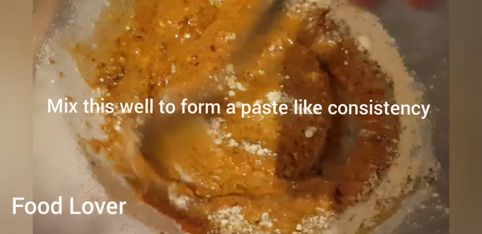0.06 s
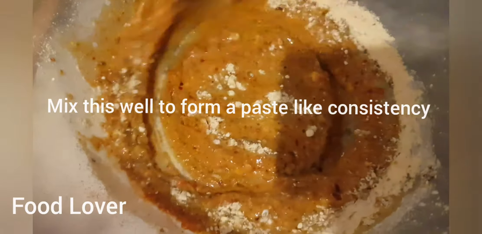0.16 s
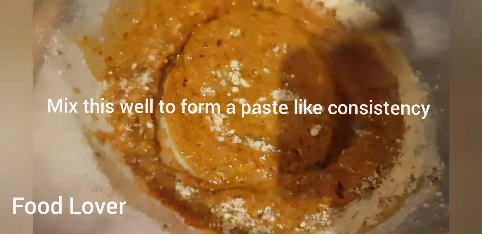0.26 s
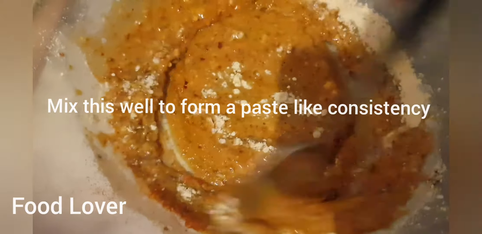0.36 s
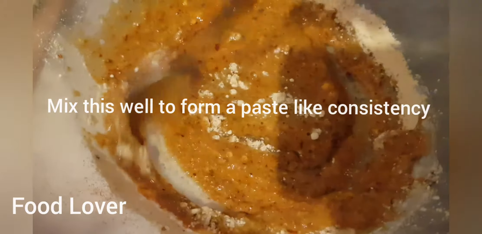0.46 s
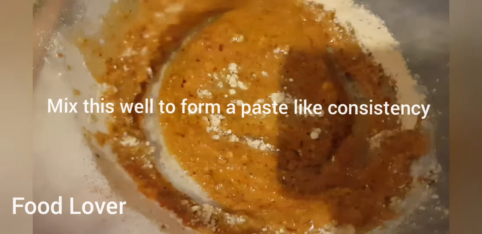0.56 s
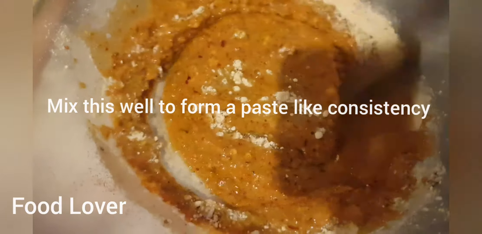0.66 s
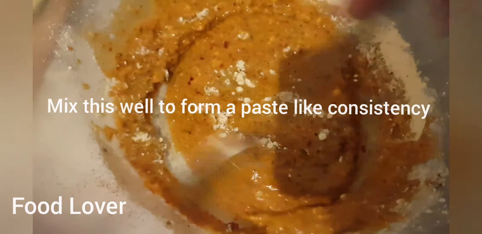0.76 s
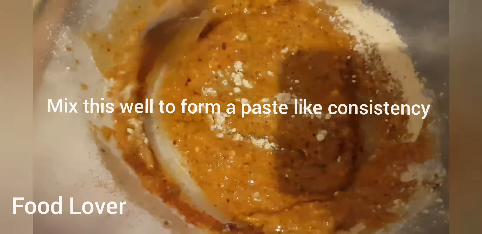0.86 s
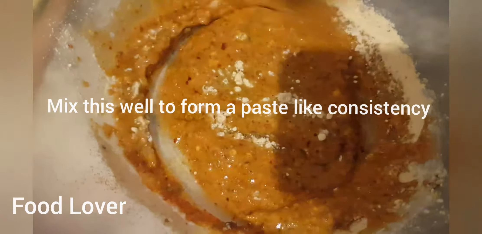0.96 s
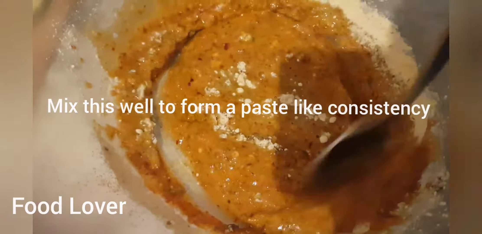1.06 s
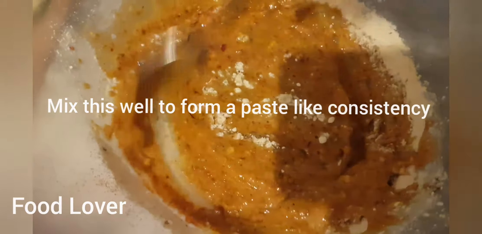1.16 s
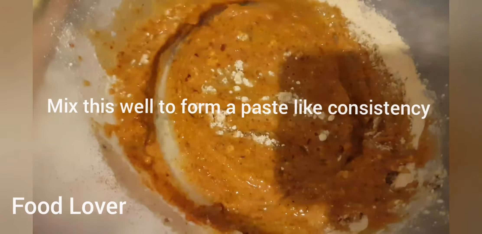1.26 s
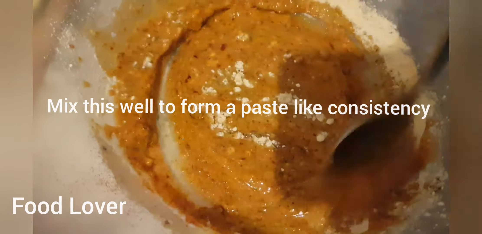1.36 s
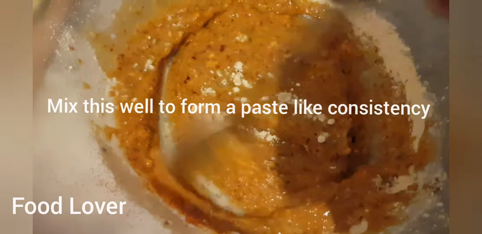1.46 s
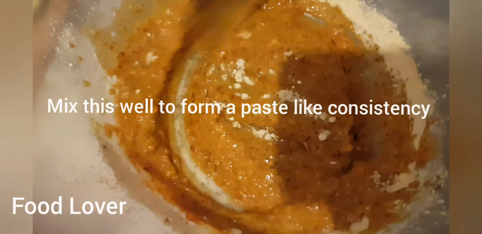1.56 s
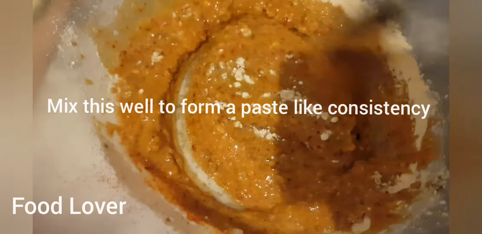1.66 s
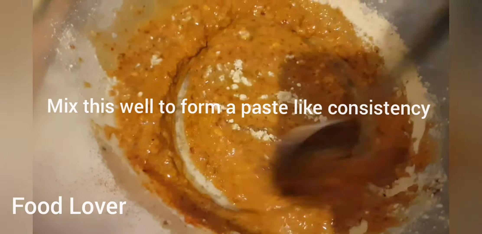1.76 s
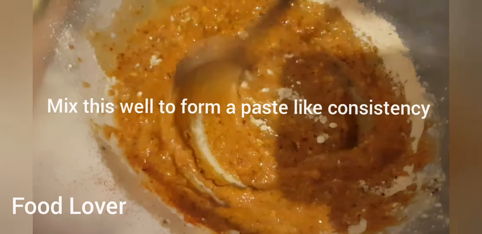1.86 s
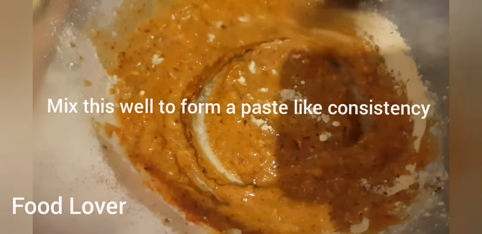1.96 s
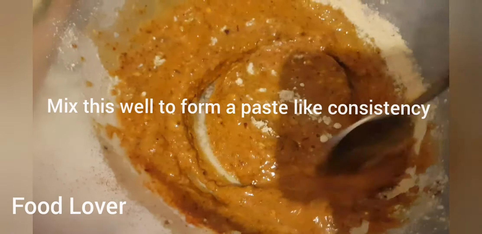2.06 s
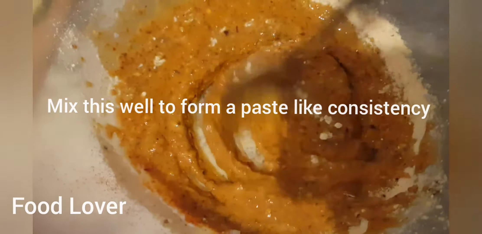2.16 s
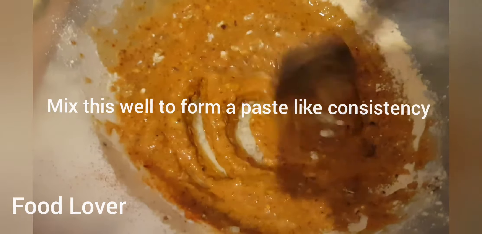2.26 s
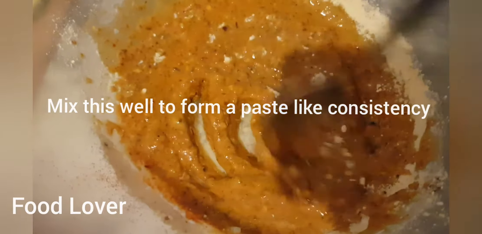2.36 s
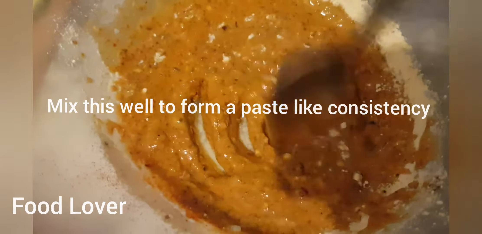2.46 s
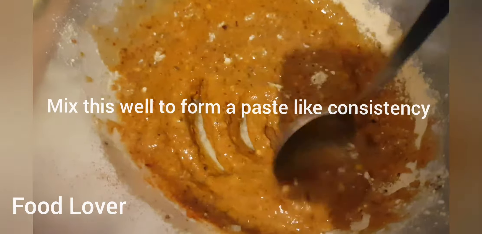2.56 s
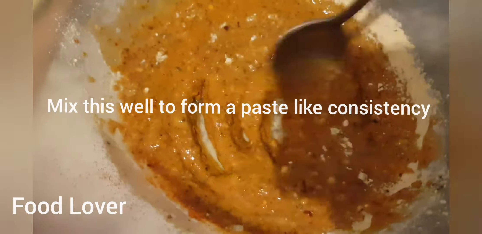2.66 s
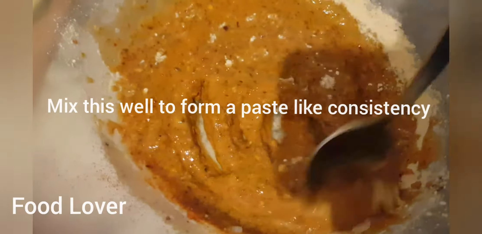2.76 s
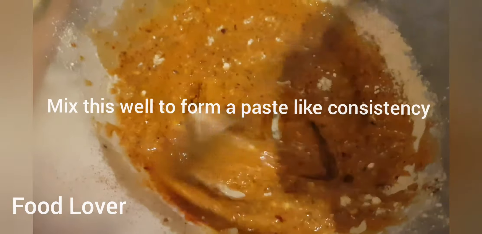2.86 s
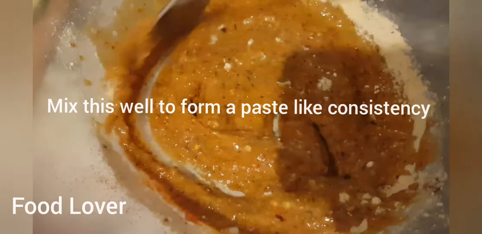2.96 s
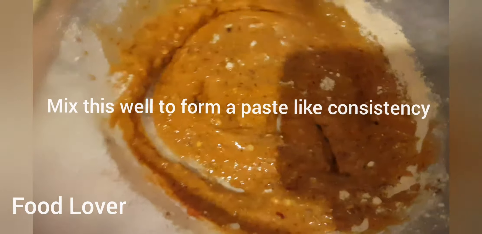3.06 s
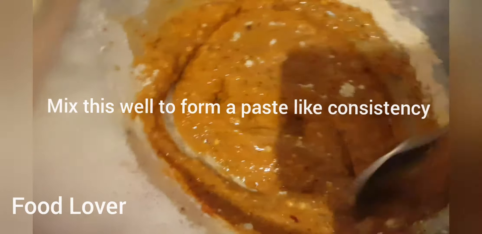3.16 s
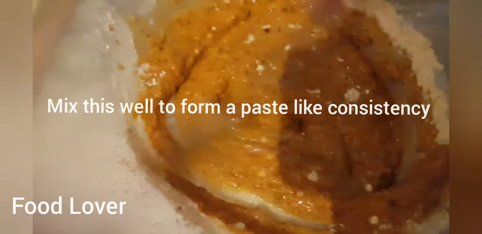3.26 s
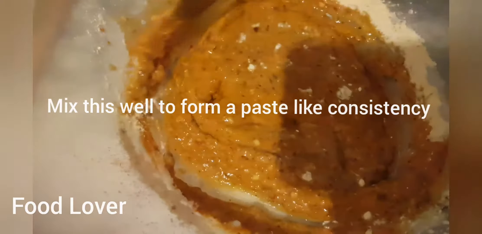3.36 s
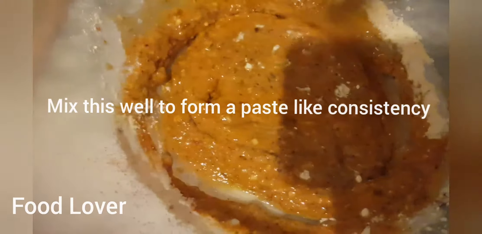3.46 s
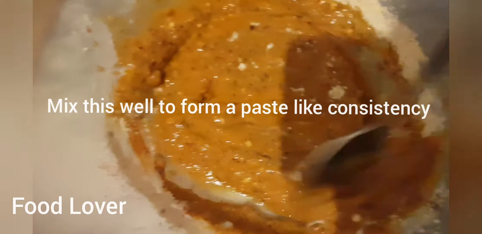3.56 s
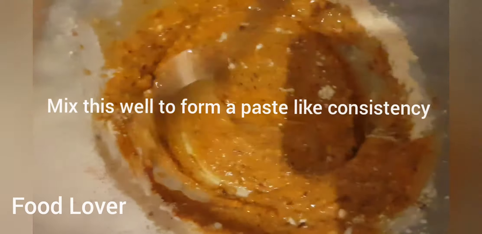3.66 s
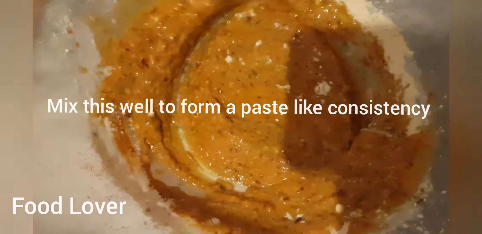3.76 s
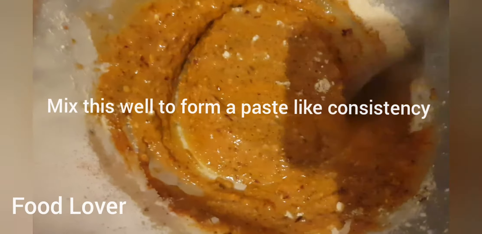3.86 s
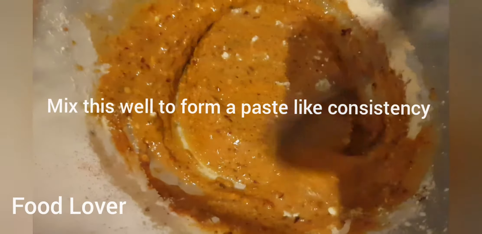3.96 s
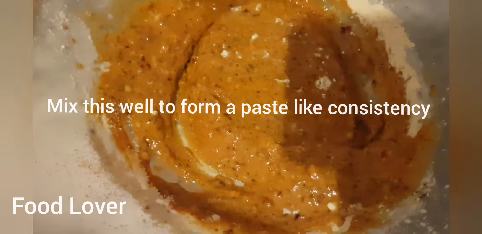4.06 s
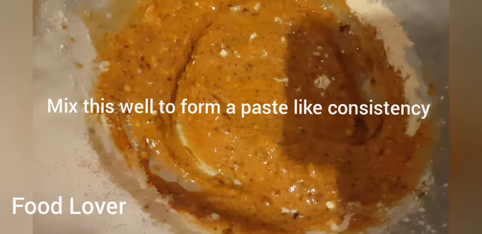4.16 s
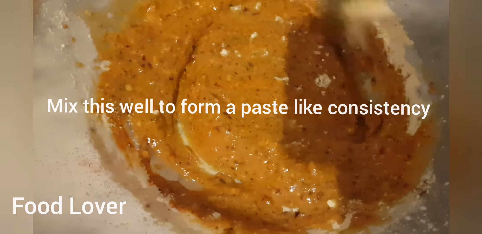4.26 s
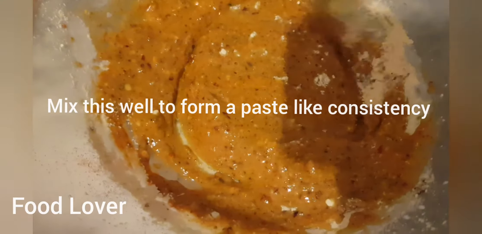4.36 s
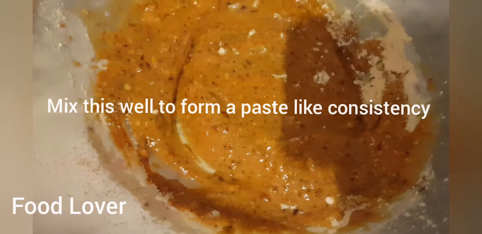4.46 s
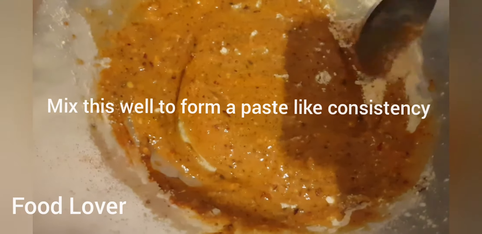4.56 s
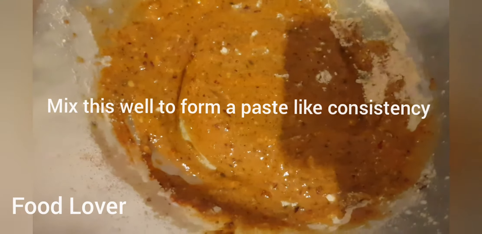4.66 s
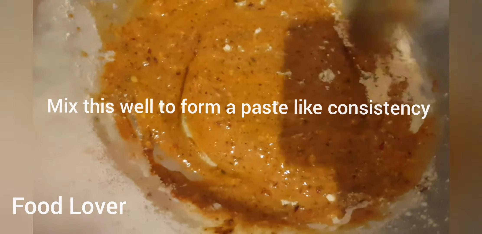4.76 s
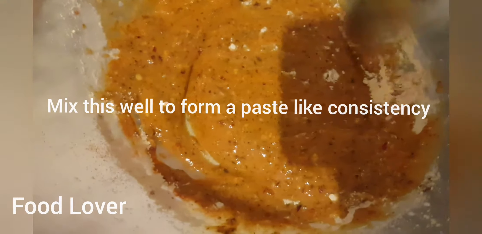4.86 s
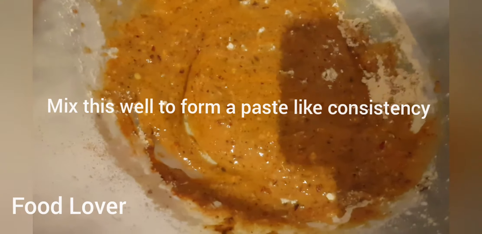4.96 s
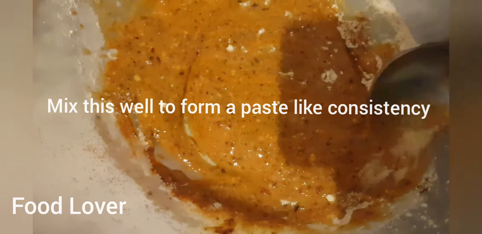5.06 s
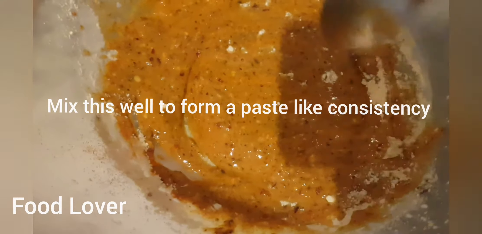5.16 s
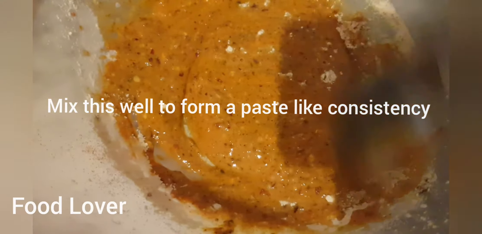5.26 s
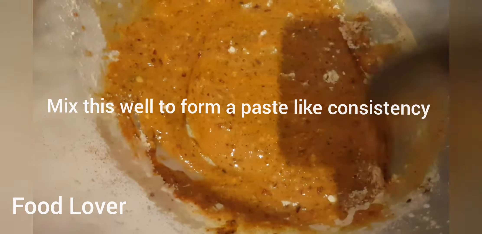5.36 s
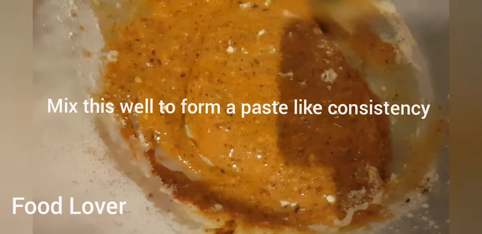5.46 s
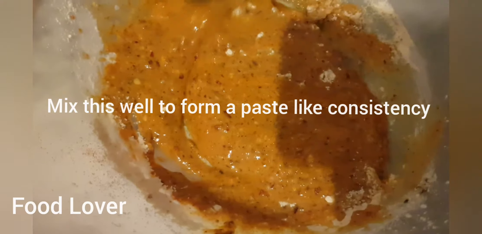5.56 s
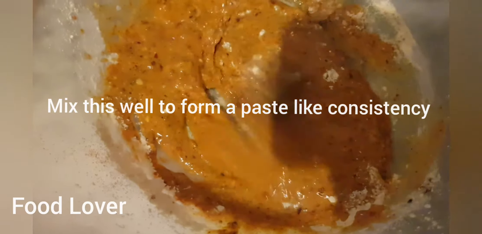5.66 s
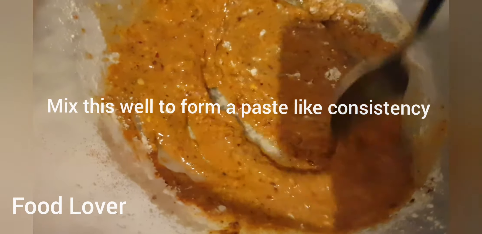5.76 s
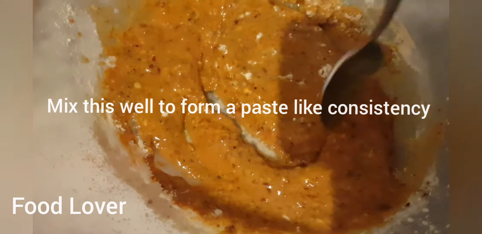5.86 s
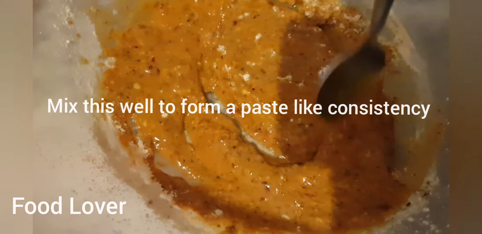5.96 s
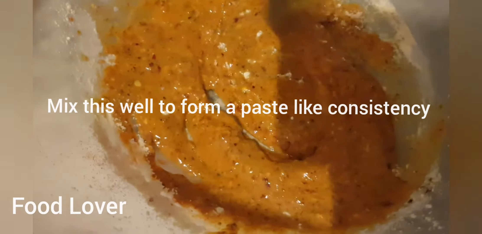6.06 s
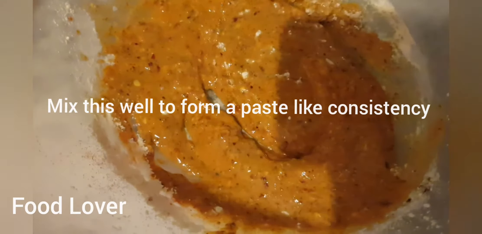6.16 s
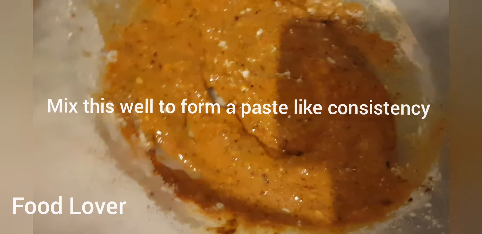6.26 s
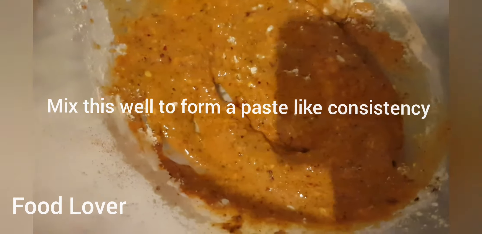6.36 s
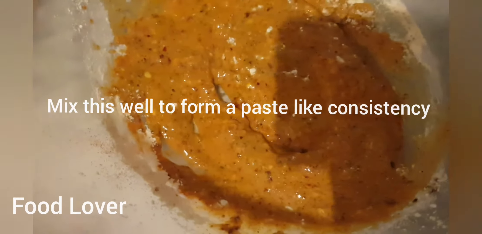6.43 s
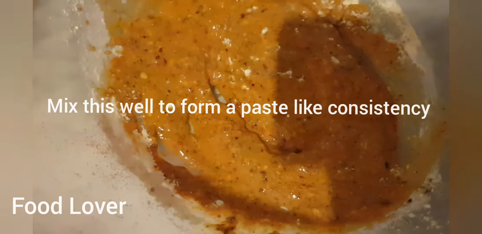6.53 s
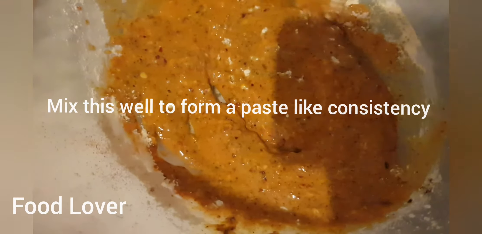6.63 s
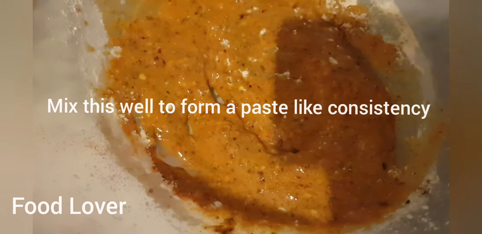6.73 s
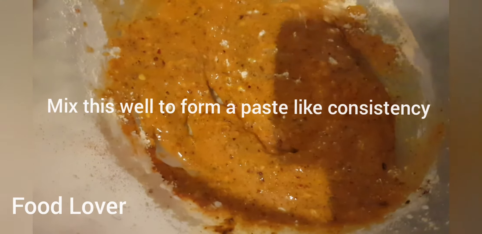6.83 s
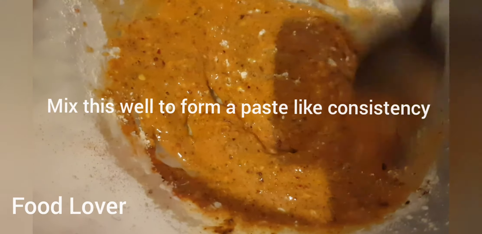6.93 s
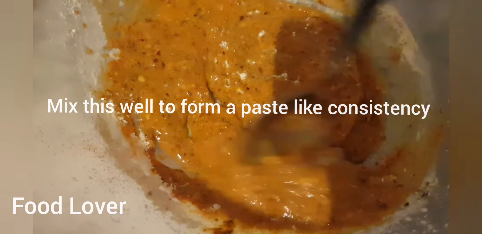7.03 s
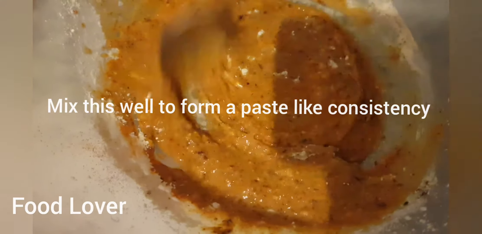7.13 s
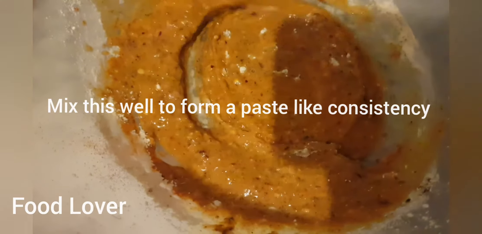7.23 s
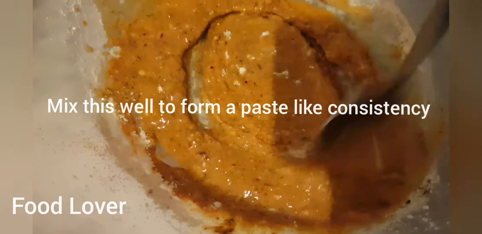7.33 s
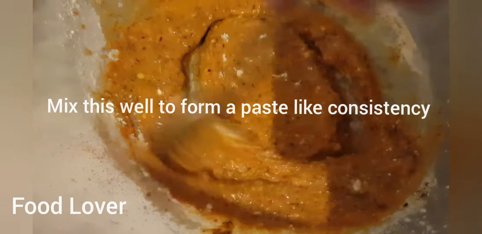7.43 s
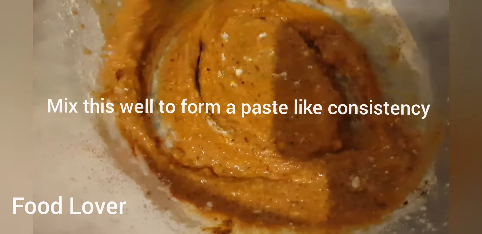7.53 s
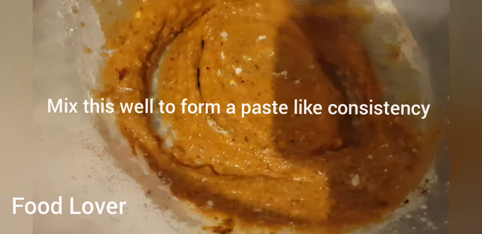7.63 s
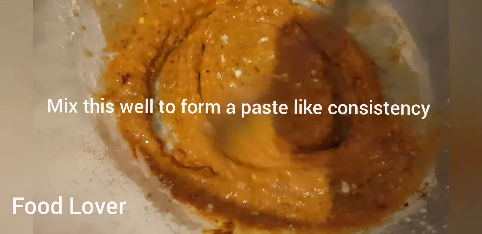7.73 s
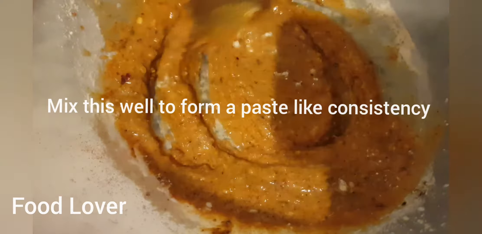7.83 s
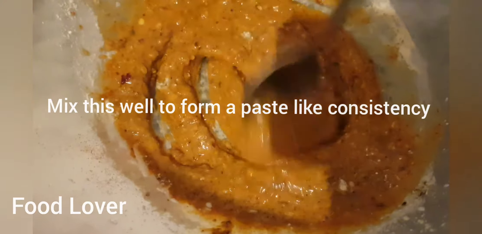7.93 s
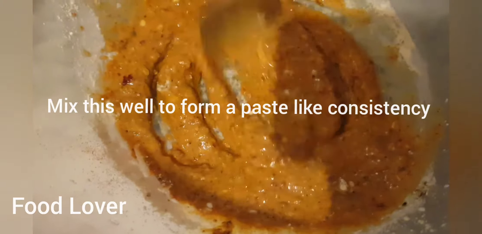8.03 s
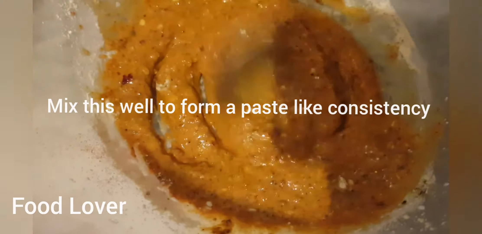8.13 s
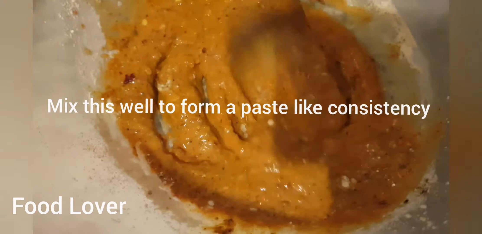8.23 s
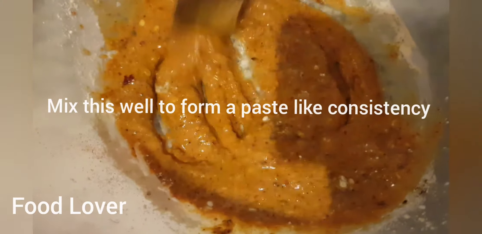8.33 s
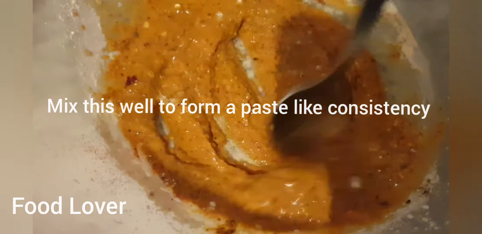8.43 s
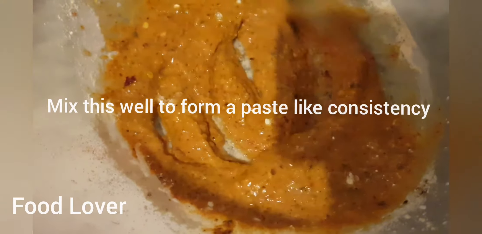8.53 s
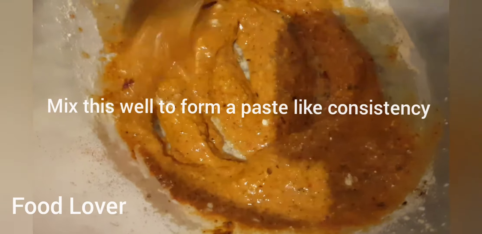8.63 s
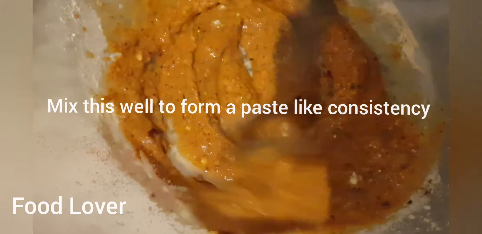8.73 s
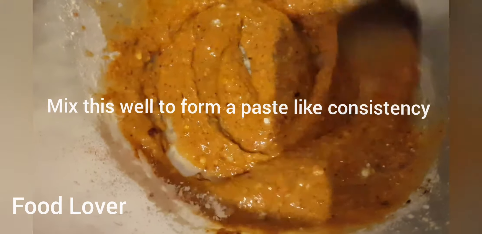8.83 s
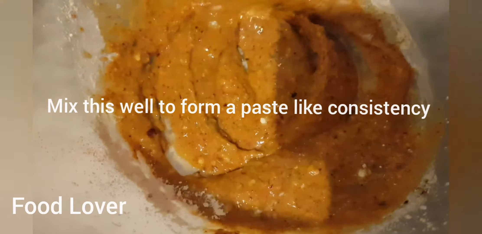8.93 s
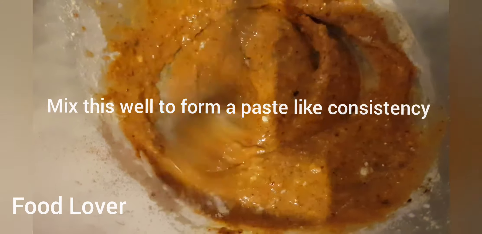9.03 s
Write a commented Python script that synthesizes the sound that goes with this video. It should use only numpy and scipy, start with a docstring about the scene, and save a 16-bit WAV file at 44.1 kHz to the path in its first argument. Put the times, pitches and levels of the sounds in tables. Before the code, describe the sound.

A metal spoon works thick, grainy paste in a plastic bowl on a counter. Low wall rumble and raspy wet strokes come first, with a hard knock at about two seconds and quick scrapes after it. The middle is quieter, mostly separate dull knocks; after seven seconds the strokes become brisk and squelchy. Close stereo phone microphone, slightly louder on the left, in a small hard kitchen with faint background hum.

```python
"""Stirring thick paste in a bowl

A metal spoon stirs paste in a plastic bowl on a kitchen counter, close to a phone, heard in stereo.
Random grit slips shake the bowl wall, rim and spoon blade; noise bursts make paste scuffs.
Knocks ring the low modes of the bowl and counter, with a short crack of steel.
A small hard room adds a dull echo, over a faint background hum of shaped noise."""
import sys
import numpy as np
from scipy import signal
from scipy.fft import rfft, irfft, next_fast_len
from scipy.io import wavfile
from scipy.ndimage import uniform_filter1d, map_coordinates

SR = 44100
rng = np.random.default_rng(int(sys.argv[2]) if len(sys.argv) > 2 else 0)


def waveform_to_disk(signal):
    """Save audio, clipped to [-1, 1], as 16-bit WAV at the path in sys.argv[1]."""
    frames = np.transpose(np.atleast_2d(signal))
    scaled = np.clip(frames, -1, 1) * 32767
    samples = np.round(scaled).astype(np.int16)
    wavfile.write(sys.argv[1], SR, samples)


N = 400869

# spoon meets the bowl wall: start_s, strength_db (relative), then three levels against the thud, each
# before a fixed offset: crack_db, counter_thump_db, lowest_bowl_modes_db
KNOCKS = [(0.167, -22.5, -32, -1, -8), (0.41, -22, -33, -14, -22), (0.75, -23.5, -22, -13, 3),
          (0.897, -19, -27, -8, -28), (1.049, -11, -31, -54.5, -16.5), (1.499, -16.5, -30.5, -24, -17.5),
          (1.675, -16, -23, -6.5, -1), (2.0058, -4, -16, -17.5, -34), (2.136, -21.5, -26, -11.5, -5.5),
          (2.748, -22.5, -24, -14.5, -7.5), (2.887, -28.5, -32, -5.5, 4.5), (3.269, -9, -33, -26, -9),
          (4.127, -34, -14, -1, 0.5), (4.414, -15.5, -16.5, -38, -1), (4.682, -9, -12.5, -58, -4),
          (4.949, -10, -14, -49, -4), (5.331, -7.5, -16.5, -9, -6.5), (5.348, -14.5, -28, -10, -9),
          (5.526, -21.5, -32, -25.5, -30), (5.743, -7, -38, -17, -12), (5.858, -15.5, -26, -11.5, -8.5),
          (6.185, -10.5, -24, -23.5, -4), (6.431, -25, -21.5, -6, -0.5), (6.514, -20.5, -21, -28, -26),
          (6.7, -12, -29.5, -28.5, -8), (6.7067, -13, -30, -30, -8), (6.842, -23, -37, -33.5, -28),
          (7.319, -17, -29, -48.5, -8.5), (7.436, -24, -21.5, -34, -13), (7.935, -17.5, -29, -44, -20),
          (8.266, -21.5, -24, -7, -22), (8.297, -24, -19, -14.5, -5), (8.549, -19, -15.5, -35, -26),
          (8.633, -23.5, -19.5, -6.5, -15), (8.916, -13, -41, -49, -31)]
# resonances of the bowl wall; the last, broad one is the wall pushed as a whole: pitch_hz, width_hz, level_db
BOWL = [(188.2, 32.4, 0), (256.7, 52, -4), (334.7, 58, -1.5), (412, 30, -8), (429.2, 52, -4.5),
        (509.7, 70, -10), (275, 144, -7.5)]
# worktop under the bowl: pitch_hz, width_hz, level_db
COUNTER = [(62, 74, -1), (122.5, 10, 0)]
# rim and spoon, damped by paste: pitch_hz, width_hz, level_db
RIM = [(650, 490, 3), (1086, 224, 4.5), (1614, 298, 8), (2036, 196, 8.5)]
# spoon blade damped by paste: pitch_hz, width_hz, level_db
BLADE = [(2450, 580, 2), (3540, 1440, -2.5), (4210, 490, -2.5)]


def amp(db):
    """Gain of a level in dB."""
    return 10 ** (np.asarray(db) / 20)


def unit(x):
    """x at rms 1."""
    return x / np.sqrt(np.mean(x ** 2) + 1e-20)


def along(points, hz):
    """Values between (Hz, value) points, read on a log frequency axis."""
    f, v = np.transpose(points)
    return np.interp(np.log(hz + 1), np.log(f + 1), v)


def wobble(rate):
    """A smooth random curve with rate knots a second."""
    return map_coordinates(rng.standard_normal(int(N * rate / SR) + 4), [np.arange(N) * rate / SR])


def filtered(x, response):
    """x shaped by a complex response of frequency."""
    m = next_fast_len(N + SR)
    return irfft(rfft(x, m) * response(np.fft.rfftfreq(m, 1 / SR)), m)[..., :N]


def modes(table):
    """Causal response of a set of damped resonances, with alternating signs."""
    def response(f):
        return sum((-1) ** k * amp(db) * 1j * f * w / (c * c - f * f + 1j * f * w)
                   for k, (c, w, db) in enumerate(table))
    return response


def roving(x, table, rate, depth_db):
    """x through resonances that each wax and wane as the spoon travels over their nodes."""
    total = 0
    for k, mode in enumerate(table):
        gain = amp(depth_db * np.tanh(wobble(rate)))
        total = total + (-1) ** k * gain * filtered(x, modes([mode]))
    return total


def soft(hz, top_hz):
    """Causal roll-off of a soft, paste-cushioned contact."""
    return 1 / (1 + 1.4j * hz / top_hz - (hz / top_hz) ** 2) ** 2


def grit(per_second, spread_db):
    """Random tiny slips of uneven but bounded size, rms 1."""
    hit = rng.random(N) < per_second / SR
    size = amp(spread_db * np.minimum(rng.exponential(size=N), 4.5))
    return unit(hit * rng.standard_normal(N) * size)


def patchy(x, depth_db):
    """x under a random gain field of time and frequency."""
    z = signal.stft(x, nperseg=256)[2]
    field = uniform_filter1d(rng.standard_normal(z.shape), size=6, axis=0)
    field = uniform_filter1d(field, size=8, axis=1)
    return signal.istft(z * amp(depth_db * unit(field)), nperseg=256)[1][:N]


def swells(rows, rounding):
    """Level in dB over time for each dB column; rounding 1 makes pointed swells, 2 makes bells."""
    t = np.arange(0, N, 64) / SR  # coarse time steps, filled in below
    peak_s, rise_ms, fade_ms, *levels_db = np.transpose(rows)[..., None]
    ms = 1000 * (t - peak_s)
    drop_db = 10 * np.where(ms < 0, -ms / rise_ms, ms / fade_ms) ** rounding
    curves = []
    for db in levels_db:
        power = (amp(db - drop_db) ** 2).sum(axis=0)
        curves.append(10 * np.log10(np.interp(np.arange(N) / SR, t, power) + 1e-12))
    return curves


def room_tone():
    """A faint background of shaped noise, partly shared by both ports, its level wavering slightly."""
    # background colour: pitch_hz, density_db (relative, per Hz)
    tone_colour = [(15, -61.5), (25, -15), (66, 0.5), (105, -14.5), (195, -9), (330, -16.5), (543, -27.5),
                   (984, -18.5), (1130, -28.5), (2530, -49), (15900, -45)]
    level_db = -54.5  # before the left-right tilt
    shared, left, right = rng.standard_normal((3, N))
    pair = np.array([shared + 0.33 * left, shared + 0.77 * right])
    pair = filtered(pair, lambda hz: amp(along(tone_colour, hz)))
    return amp(level_db + 1.0 * wobble(4.7)) * unit(pair) * amp([[1.5], [-1.5]])


def pressure():
    """Gain of the wall rumble: the spoon leans on the wall, and slides on after each knock."""
    # spoon leans on the wall: peak_s, rise_ms and fade_ms (each for the first 10 dB), rumble_db
    push_rows = [(0.024, 62, 23, -33), (0.239, 15, 8, -25.5), (0.251, 130, 98, -32), (0.313, 16, 6.8, -25),
                 (0.482, 180, 28, -33.5), (0.563, 35, 80, -28.5), (0.63, 76, 85.7, -26.5),
                 (0.79, 18, 290, -37.5), (1.147, 350, 115, -32), (1.265, 40, 6.1, -26.5),
                 (1.403, 89, 119, -32.5), (1.622, 28, 160, -33.5), (2.17, 180, 140, -40.5),
                 (2.51, 5.7, 49, -39.5), (2.936, 95, 63, -38.5), (2.998, 22, 17, -34), (3.1, 53, 100, -34),
                 (3.478, 230, 127, -33), (3.606, 45, 30, -37.5), (3.765, 37, 21, -35), (3.876, 96, 42, -33),
                 (4.272, 39, 18, -42), (4.565, 150, 49, -48.5), (4.747, 63, 39, -47.5), (4.82, 21, 19, -41),
                 (5.054, 86, 29, -40.5), (5.448, 45, 34, -33), (5.56, 11, 18, -32), (6.253, 43, 52, -39.5),
                 (6.537, 84, 16, -40.5), (6.94, 160, 100, -36), (7.471, 270, 168, -39),
                 (7.548, 10, 13, -31.5), (7.691, 21, 26, -37), (7.786, 10, 16, -35.5),
                 (8.15, 7.7, 12, -32.5), (8.336, 220, 160, -44), (8.546, 6.2, 9.9, -32),
                 (8.732, 117, 57, -35.5), (9.097, 170, 170, -33.5)]
    slide_db, slide_fade_db_per_s, slide_rise_s = -15.5, 290.5, 0.011  # level is against knock strength
    power = amp(swells(push_rows, rounding=1.54)[0]) ** 2
    t = np.arange(SR // 2) / SR
    for s, db, *_ in KNOCKS:
        after = power[round(s * SR):][:len(t)]
        slide = amp(db + slide_db - slide_fade_db_per_s * t) * (1 - np.exp(-(t / slide_rise_s) ** 2))
        after += slide[:len(after)] ** 2  # adds into power
    return np.sqrt(power)


def rumble():
    """Slips under pressure shake the wall and counter; wall modes vary as the spoon crosses their nodes."""
    slips = grit(1500, spread_db=2.0)
    wall = roving(slips, BOWL[:-1], 11, depth_db=5.0)
    shaken = wall - amp(-7.0) * filtered(slips, modes(COUNTER))
    # sliding drives the higher modes more than a blow does
    wall = filtered(shaken, lambda hz: soft(hz, top_hz=545) * 1j * hz / (260 + 1j * hz))
    # the hand evens out the loudest jolts
    even = wall / np.abs(uniform_filter1d(wall ** 2, size=SR // 25)) ** 0.18
    lumps = amp(1.2 * np.tanh(wobble(30)))  # lumps in the paste
    return pressure() * unit(lumps * even)


def drag():
    """Grit slips under the spoon edge and shakes rim and blade; wet paste hisses as it parts."""
    # strokes of the edge: peak_s, rise_ms and fade_ms (each for the first 10 dB),
    # rim_rasp_db, blade_rasp_db, wet_hiss_db (before the uneven grip)
    stroke_rows = [(0.114, 73, 54, -37, -38.5, -39), (0.236, 71, 36, -37, -40.5, -36),
                   (0.298, 30, 41, -40.5, -38.5, -37.5), (0.399, 77, 49, -40.5, -42, -47.5),
                   (0.482, 63, 40, -39, -50.5, -36.5), (0.619, 85, 163, -37.5, -41.5, -39.5),
                   (0.908, 180, 780, -41.5, -46.5, -46.5), (1.208, 27, 57, -36.5, -40.5, -39),
                   (1.389, 64, 30, -46.5, -47, -52.5), (1.558, 40, 52, -41.5, -43.5, -43),
                   (1.727, 270, 58, -41, -39.5, -42.5), (1.868, 35, 59, -32.5, -35.5, -39),
                   (2.013, 50, 67, -33.5, -35.5, -35.5), (2.184, 24, 47, -35, -35, -45.5),
                   (2.331, 47, 46, -41.5, -41, -50), (2.418, 18, 58, -36.5, -42.5, -49.5),
                   (2.517, 21, 39, -34.5, -35.5, -45.5), (2.628, 28, 43, -34, -38, -43),
                   (2.719, 37, 59, -36.5, -41, -47), (2.88, 42, 87, -50, -45, -43.5),
                   (3.134, 240, 280, -44, -47.5, -51), (3.462, 50, 48, -36, -45, -44),
                   (3.463, 360, 175, -45.5, -45.5, -49), (3.626, 14, 62, -45.5, -43, -37.5),
                   (3.827, 163, 89, -42, -43.5, -43), (4.245, 56, 48, -48, -42, -40.5),
                   (4.533, 76, 63, -52.5, -50, -49), (4.741, 37, 94, -49.5, -47, -47.5),
                   (5.027, 30, 63, -51, -51.5, -45.5), (5.449, 54, 32, -43.5, -47, -44),
                   (5.549, 69, 71, -45, -48.5, -48), (5.698, 76, 68, -44, -47.5, -49),
                   (5.86, 18, 63, -57, -59, -60.5), (6.245, 23, 50, -39.5, -44.5, -42.5),
                   (6.511, 43, 43, -41.5, -50, -42), (6.751, 28, 29, -40, -53.5, -46),
                   (6.915, 77, 90, -43.5, -43.5, -44.5), (7.112, 45, 72, -37.5, -37, -40.5),
                   (7.259, 44, 65, -41, -43, -45), (7.317, 35, 40, -38, -34, -42.5),
                   (7.41, 85, 250, -46.5, -47.5, -47), (7.665, 57, 57, -38, -35.5, -46.5),
                   (7.789, 30, 69, -36.5, -37.5, -38.5), (7.945, 37, 57, -33.5, -37.5, -49.5),
                   (8.051, 29, 33, -33, -37.5, -38), (8.189, 40.6, 18, -28, -32, -38),
                   (8.27, 40, 44, -35, -40, -36.5), (8.423, 51, 35, -32.5, -33.5, -38),
                   (8.556, 65, 55, -33.5, -34, -37.5), (8.638, 26, 15, -40.0, -39.5, -33),
                   (8.728, 130, 96, -45, -40.5, -46), (9.07, 127, 47, -38.5, -41.5, -39)]
    # hiss colour: pitch_hz, density_db (relative, per Hz)
    hiss_colour = [(2350, -8), (4000, 1.5), (5790, 2), (7860, -3), (11600, -1), (15200, -6.5)]
    catch_per_s, catch_fade_s = 45, 0.014
    rim_db, blade_db, hiss_db = swells(stroke_rows, rounding=1.28)
    # the edge catches on a grain at once, then lets go
    grains = (rng.random(N) < catch_per_s / SR) * rng.random(N)
    catch = signal.lfilter([1], [1, -np.exp(-1 / (catch_fade_s * SR))], grains)
    judder = np.tanh(unit(catch - catch.mean()))  # uneven grip of the edge
    slips = grit(2500, spread_db=0.5)
    rim, blade = [unit(patchy(roving(slips, part, 22, depth_db=3.5), depth_db=1.2))
                  for part in (RIM, BLADE)]
    hiss = filtered(grit(9000, spread_db=-0.5), lambda hz: amp(along(hiss_colour, hz)))
    hiss = unit(patchy(hiss, depth_db=2.5))
    rasp = amp(1.96 * judder) * (amp(rim_db) * rim + amp(blade_db) * blade)
    return rasp + amp(hiss_db + 3.0 * judder) * hiss


def scuffs():
    """Each scuff is a crunch of grit that starts faster when short, rings an air pocket and dies."""
    # scuffs and slaps through the paste: start_s, strength_db (relative), fade_s (time to fall 60 dB), pocket_hz
    scuff_rows = [(0.107, -27, 0.08, 1740), (0.477, -24, 0.064, 1800), (0.605, -29, 0.1, 4500),
                  (0.755, -30.5, 0.25, 1900), (1.194, -29, 0.074, 1636), (2.007, -8, 0.012, 2400),
                  (2.169, -26.5, 0.05, 1520), (2.184, -24.5, 0.033, 1550), (2.312, -30.5, 0.16, 4240),
                  (2.412, -19, 0.06, 1490), (2.508, -16.5, 0.014, 1740), (2.523, -28, 0.03, 3820),
                  (2.62, -20.5, 0.063, 1530), (2.708, -28, 0.17, 4140), (2.869, -28.5, 0.03, 4400),
                  (4.814, -23, 0.015, 1810), (5.405, -29.5, 0.042, 2480), (5.661, -33, 0.16, 2900),
                  (5.703, -27.5, 0.031, 1780), (6.23, -34, 0.073, 5940), (6.743, -30.5, 0.035, 1900),
                  (7.092, -28, 0.047, 1810), (7.13, -28, 0.05, 1916), (7.667, -25, 0.037, 2360),
                  (7.779, -22, 0.052, 1600), (7.936, -18, 0.08, 936), (8.017, -20, 0.035, 1590),
                  (8.144, -30.5, 0.15, 4200), (8.184, -21.5, 0.07, 1710), (8.237, -17.5, 0.06, 1546),
                  (8.265, -20.5, 0.04, 980), (8.285, -21, 0.037, 1600), (8.386, -25.5, 0.22, 3030),
                  (8.555, -9.5, 0.025, 920)]
    out, t = np.zeros(N + SR), np.arange(SR // 5) / SR
    hz = np.fft.rfftfreq(len(t), 1 / SR)
    for s, db, t60, pocket_hz in scuff_rows:
        fade = amp(-60 * t / max(t60, .005)) * (1 - np.exp(-t / (1.3 * t60 ** 3 + 1e-4)))
        crunch = rng.standard_normal(len(t))
        burst = fade * crunch * amp(5.5 * np.minimum(rng.exponential(size=len(t)), 4.5))
        burst *= np.linalg.norm(fade) / np.linalg.norm(burst)
        pocket = modes([(pocket_hz, .42 * pocket_hz, 0)])(hz) ** 2
        colour = pocket + amp(-13.5) * modes(RIM + BLADE)(hz)
        out[round(s * SR):][:len(t)] += amp(db + 9.0) * irfft(rfft(burst) * colour, len(t))
    return out[:N]


def ring(table, t, draw):
    """Free ringing of modes; strength and pitch shift a little with the place of the blow."""
    total = 0
    for k, ((hz, w, db), (d, e)) in enumerate(zip(table, draw)):
        tone = np.exp(-np.pi * w * t) * np.cos(2 * np.pi * hz * (1 + 0.029 * e) * t)
        total = total + (-1) ** k * amp(db + 1.77 * d) * w * tone
    return total


def knocks():
    """A cushioned push rings bowl and counter; as paste gives way, steel cracks, coloured anew each time."""
    # steel on the bare wall, before random shifts and dulling: pitch_hz, width_hz, level_db
    clack_modes = [(970, 380, -6), (1600, 370, 3.5), (2130, 300, 5), (2750, 780, -3), (3900, 1360, -11)]
    # ring of the tip's first touch: pitch_hz, width_hz, level_db
    touch_modes = [(2600, 1500, 5), (6100, 2500, -4)]
    touch_db = -3.5  # added to the strength and half the crack level
    yield_s, yield_share = 0.0014, 0.23  # the wall draws back this long before the push, this strongly
    tick_db = 15.5  # boost of the crack's first sample
    crack_t60, skid_t60, skid_db = 0.011, 0.22, -16.5  # s, s, dB: crack, then a short skid of steel
    hard_db, dull_db_per_octave = -6.5, 0.57  # bare-wall crack level; treble lost per dB below it
    thud, crack, t = np.zeros(N + SR), np.zeros(N + SR), np.arange(SR // 4) / SR
    hz, touch = np.fft.rfftfreq(len(t), 1 / SR), np.zeros(N)
    for s, db, crack_db, thump_db, low_db in KNOCKS:
        draw = rng.standard_normal((2, len(BOWL), 2))
        wall = amp(low_db + 7.0) * ring(BOWL[:2], t, draw[0]) + ring(BOWL[2:], t, draw[0, 2:])
        thump = amp(thump_db + 6) * ring(COUNTER, t, draw[1])
        thud[round((s + .0015) * SR):][:len(t)] += amp(db - 36.5) * (wall - thump)

        fade = amp(-60 * t / crack_t60) + amp(skid_db - 60 * t / skid_t60)
        burst = amp(db + crack_db + 12.0) * fade * rng.choice([-1, 1], len(t))
        burst[0] *= amp(tick_db)
        touch[round((s + .0012) * SR)] = amp(db + .5 * crack_db + touch_db)

        # paste tilts a weak crack from high to low around the second steel mode
        dull_db = dull_db_per_octave * np.clip(crack_db - hard_db, -8, 0)
        shifts = rng.standard_normal(len(clack_modes))
        steel = modes([(c, w, level + 1.6 * d + dull_db * np.log2(c / clack_modes[1][0]))
                       for (c, w, level), d in zip(clack_modes, shifts)])
        crack[round((s + .0027) * SR):][:len(t)] += irfft(rfft(burst) * steel(hz), len(t))

    def cushion(hz):
        draw_back = 1 - yield_share * np.exp(2j * np.pi * hz * yield_s)
        return soft(hz, top_hz=545) * soft(hz, top_hz=804) * draw_back
    return filtered(thud[:N], cushion) + crack[:N] + filtered(touch, modes(touch_modes))


def ports(x):
    """Two microphone ports share the bass, louder on the left; in the treble they differ and drift apart."""
    # likeness of left and right: pitch_hz, likeness (0 to 1)
    likeness = [(60, 1), (450, 0.92), (620, 0.72), (1500, 0.58), (10000, 0.0091)]
    # left over right: pitch_hz, level_db
    left_over_right = [(60, 5), (180, 7.5), (330, 6.5), (700, 5), (2000, 6), (10000, 3.5)]
    z = signal.stft(x, nperseg=128)[2]
    field = uniform_filter1d(rng.standard_normal(z.shape), size=3, axis=0)
    field = uniform_filter1d(field, size=24, axis=1)
    other = signal.istft(z * np.exp(2.5j * unit(field)), nperseg=128)[1]
    other = np.pad(other, (32, 0))[:N]  # the second path is 32 samples longer
    other *= np.std(x) / np.std(other)

    def shares(hz):
        turn = np.arccos(np.clip(along(likeness, hz), -1, 1)) / 2
        return np.array([np.cos(turn), np.sin(turn)])

    def lead_and_tilt(hz):
        lead = np.exp(2j * np.pi * hz * np.array([[1], [-1]]) * .00008)  # left 0.08 s/1000 early, right late
        return lead * amp(along(left_over_right, hz) * np.array([[.5], [-.5]]))
    mid, side = filtered(np.array([x, other]), shares)
    return filtered(np.array([mid + side, mid - side]), lead_and_tilt)


def kitchen(x):
    """Each frequency of the room's answer dies at its own speed; long bass waves reach both ports alike."""
    # echo fade: pitch_hz, fade_s (time to fall 60 dB)
    echo_fade = [(100, 0.34), (500, 0.17), (2000, 0.61), (10000, 0.24)]
    hz, t, z = signal.stft(rng.standard_normal((2, SR // 2)), SR, nperseg=256)
    z[1] = np.where(hz[:, None] < 550, z[0], z[1])
    tail = signal.istft(z * amp(-60 * t / along(echo_fade, hz)[:, None]), SR, nperseg=256)[1]
    late = np.pad(x, (300, 0))[None]  # the echo starts 300 samples late
    return signal.fftconvolve(late, tail / np.linalg.norm(tail[0]), axes=1)[:, :N]


def scene():
    """Bowl sounds at the ports, their dull echo and the background."""
    bowl = rumble() + drag() + scuffs() + knocks()
    echo_dull_hz = 900  # the echo loses treble above this
    echo = kitchen(filtered(bowl, lambda hz: 1 / (1 + 1j * hz / echo_dull_hz)))
    return ports(bowl) + amp(-9.0) * echo + room_tone()


def record(dry):
    """The phone's microphone loses deep bass, rounds off the hardest knocks and cuts the top treble."""
    top_hz = 15950
    heard = filtered(dry, lambda hz: (1j * hz / (36 + 1j * hz)) ** 2)
    rounded = heard / (1 + np.abs(heard / .9) ** 6) ** (1 / 6)
    return filtered(rounded, lambda hz: hz < top_hz)


dry = scene()
out = record(dry)
waveform_to_disk(out)
```